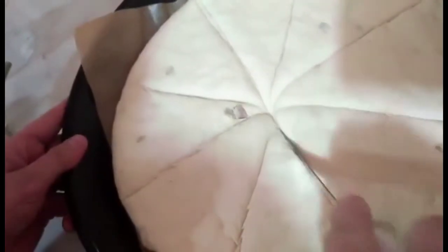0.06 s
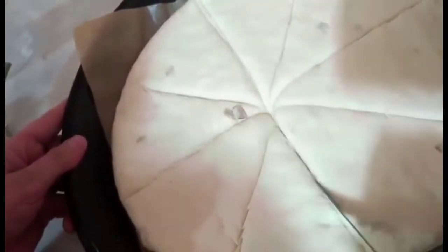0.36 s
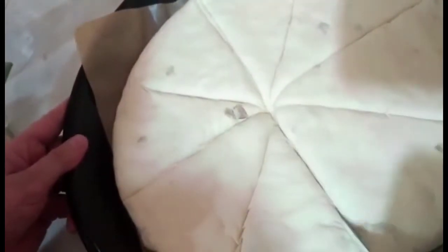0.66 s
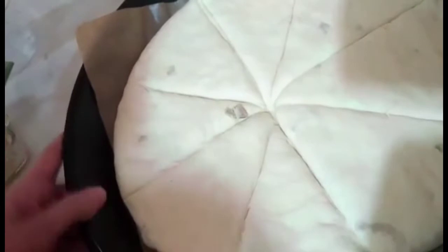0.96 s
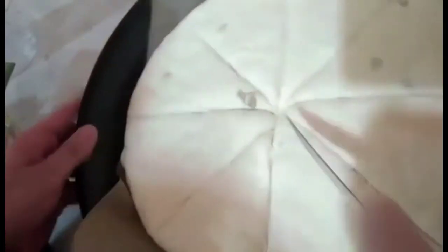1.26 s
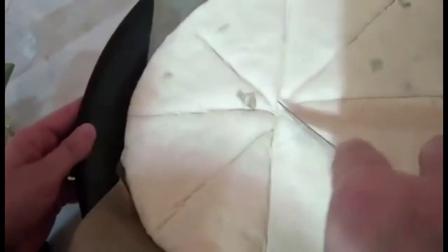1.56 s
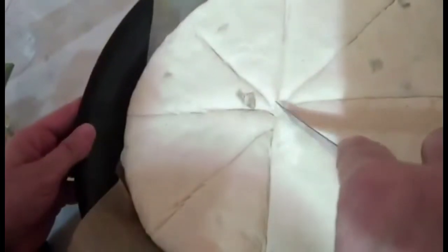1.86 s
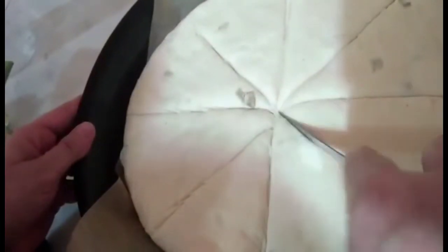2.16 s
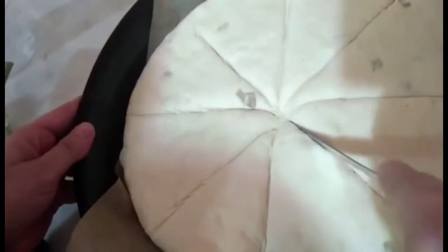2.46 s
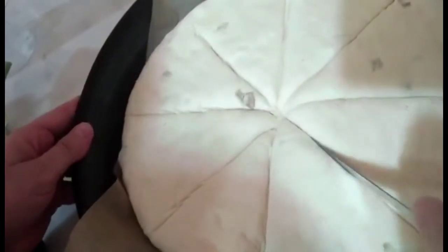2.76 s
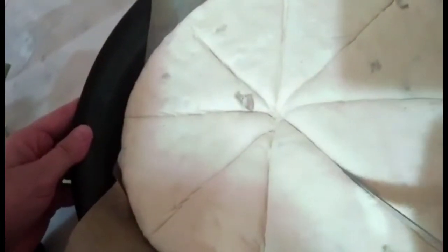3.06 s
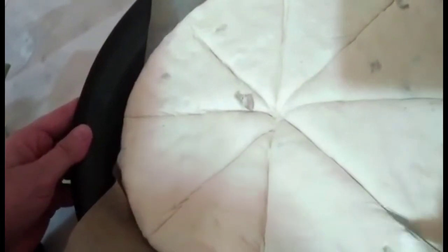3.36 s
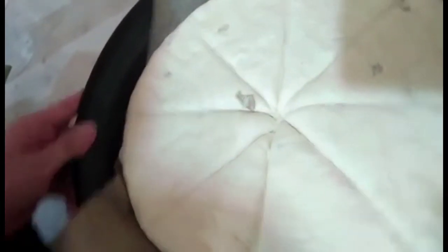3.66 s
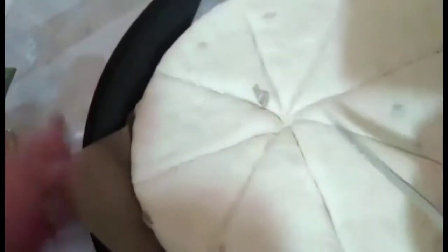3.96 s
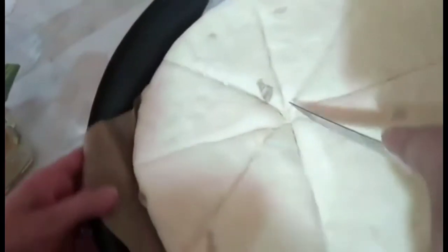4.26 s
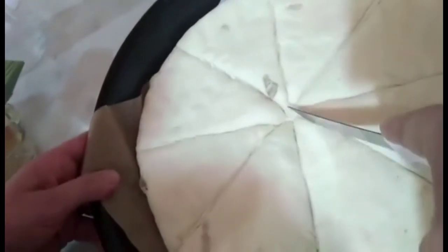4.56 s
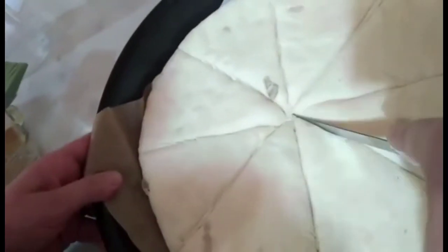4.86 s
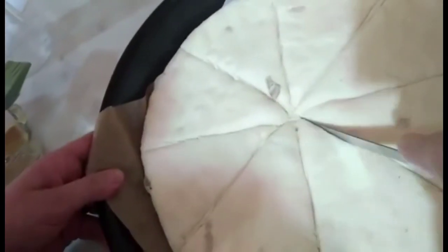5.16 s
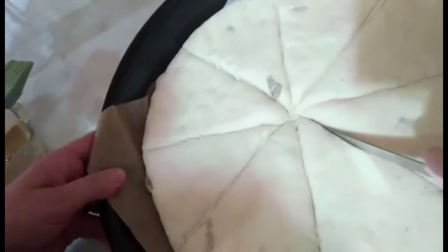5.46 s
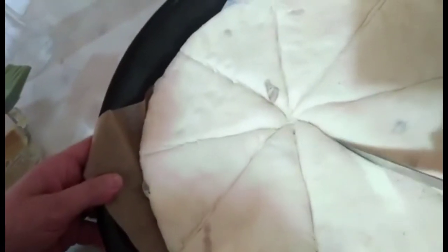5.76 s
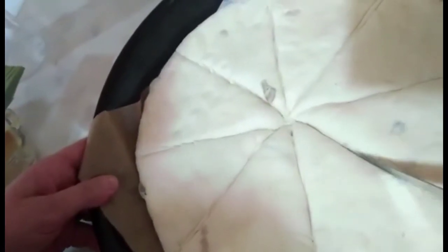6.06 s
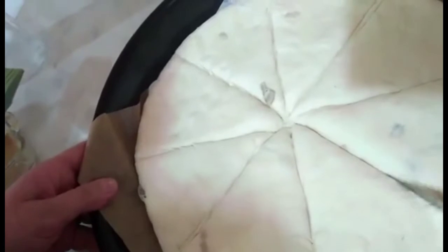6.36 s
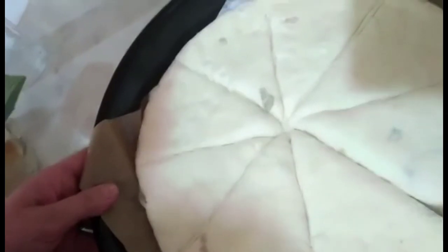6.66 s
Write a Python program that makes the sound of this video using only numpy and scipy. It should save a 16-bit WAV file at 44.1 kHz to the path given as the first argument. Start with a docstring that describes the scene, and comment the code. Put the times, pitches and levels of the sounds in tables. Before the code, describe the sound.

Close, fairly quiet handling sounds come in three short bursts as dough is cut in a paper-lined metal pan. First come a knife clink and the pan bumping and sliding on the table. Next are several short scrapes with crisp rustles and snaps of baking paper. Last, the blade clinks twice on the rim. Faint blade swishes, ticks and soft hand bumps sit between them over small-kitchen room air.

```python
"""Cutting dough in a metal pan.

Dough is cut into wedges in a paper-lined pan, in a small kitchen. The knife clinks and drags on the
rim, exciting the pan's modes. A hand turns the pan, which knocks and scrapes on the table by stick
and slip, then nudges it while pressing the baking paper, which rustles, buckles and snaps. Between
the bursts: faint swishes and ticks of the blade, low bumps of the hands, quiet room air."""
import sys
import numpy as np
from scipy import signal
from scipy.fft import rfft, irfft, next_fast_len
from scipy.io import wavfile

SR = 44100
rng = np.random.default_rng(int(sys.argv[2]) if len(sys.argv) > 2 else 0)


def generate_wav(signal):
    """Clip the signal to [-1, 1] and save it as 16-bit WAV at the path in sys.argv[1]."""
    frames = np.transpose(np.atleast_2d(signal))
    scaled = np.clip(frames, -1, 1) * 32767
    pcm = np.round(scaled).astype(np.int16)
    wavfile.write(sys.argv[1], SR, pcm)


N = 304731

# pan modes (frequency [Hz], level at rim spot a [dB], at b [dB], at c [dB], t60 [s])
PAN_MODES = [(662, -17.5, -18, -36, 0.38), (775, -21.5, -22, -14, 0.11), (983, -9, -5, -30, 0.22),
             (1019, -29.5, -18, -21, 0.24), (1193, -14.5, -12, -22, 0.19), (1314, -2, -15, -23.5, 0.17),
             (1514, 0.5, -13.5, -7, 0.28), (1630, -11, -5, -45, .2), (1698, -16, -9.5, -1, 0.089),
             (1971, -16, -12.5, -7, 0.22), (1932, -10, -8, -8, 0.36), (2135, -6.5, -3.5, -7, 0.13),
             (2228, -17, -13, -5, 0.3), (2425, -24, -16, -3, .2), (2505, -20, -7, -9, .28),
             (2562, -7.5, -9, -13, 0.15), (2610, -16, -5, -16, 0.14), (2858, 0, -3.5, -22, 0.28),
             (2900, -8.5, -6, -14.5, 0.15), (2980, -15.5, -16, -22, 0.37), (3260, -23, -18, -19, 0.12),
             (3388, -19.5, -13, -8, .12), (3890, -31, -25, -34, 0.14), (5010, -12, -10.5, -39, 0.065),
             (5450, -27, -12, -18, 0.057)]
# knife on rim (time [s], ring [dB], rim spot, clack [dB], clack tilt [dB/oct], extra contact ring [dB])
RIM_CLINKS = [(0.9626, -33.3, "a", -33, 0.5, -21), (1.1155, -45.5, "b", -47, 3, 7),
              (6.7486, -35.5, "c", -32, -.5, 2), (6.879, -35, "c", -23.5, 1, 5)]
# blade along rim (start [s], hold [s], level [dB], rim spot)
RIM_DRAGS = [(1.026, .04, -50, "b"), (1.09, .024, -44, "b"), (6.787, .042, -44.5, "c"),
             (6.86, .01, -45.5, "c")]
# light touches of the rim (time [s], level [dB], frequency [Hz], t60 [s])
RIM_GRAZES = [(1.372, -46, 2380, 0.2), (3.935, -52, 2445, .42)]
# pan on table (time [s], level [dB], decay [s], pitch factor)
PAN_KNOCKS = [(1.168, -44.5, 0.016, 1.01), (1.2912, -34, 0.012, 0.98), (3.665, -41, .016, 1.85),
              (3.904, -53, 0.011, 1.6), (4.23, -50, .01, 1.1)]
# hand turns the pan, then (last two rows) presses the rustling paper and nudges the pan
# (start [s], rise [s], slowing [s], scrape [dB], paper hiss [dB])
HAND_PUSHES = [(1.165, .012, .058, -43.5, -49), (1.238, .05, .125, -46.3, -51),
               (3.657, .022, .128, -47.5, -51), (3.885, .024, .085, -47.7, -50.5),
               (4.21, .018, .092, -49, -51), (4.325, .015, .115, -63.5, -61.5)]
# modes of the scraped pan (frequency [Hz], relative level [dB], t60 [s])
SCRAPE_MODES = [(603, -13, 0.35), (807, -1, .4), (998, -4, .3), (1098, -5, .4), (2358, -5, .25),
                (2420, -2, 0.27), (2510, -3, .2), (2850, -4.5, .2), (3470, -4, .12)]
# fingers or blade brush paper (start [s], hold [s], level [dB])
PAPER_BRUSHES = [(.966, .055, -60.5), (1.03, .04, -57), (1.086, .03, -54.5), (1.12, .04, -62.5),
                 (3.518, .04, -70.5), (3.595, .035, -69), (3.698, .055, -47.5), (3.8, .05, -61),
                 (3.86, .025, -51.5), (4.158, .018, -57), (4.19, .03, -51.5), (4.325, .12, -63),
                 (6.755, .11, -64)]
# paper buckles under fingers (start [s], hold [s], level [dB])
PAPER_CRUMPLES = [(3.752, .014, -48), (4.214, .042, -43.5), (4.276, .026, -43), (4.388, .012, -56)]
# creases snap (time [s], level [dB], decay [s], tilt [dB/oct])
CREASE_SNAPS = [(3.603, -59, .014, -10.5), (3.6349, -32.5, 0.00233, -4.5), (3.6545, -33.5, 0.0037, 2),
                (3.7548, -35, .003, -2.5), (3.987, -46, 0.004, -4), (4.182, -46, 0.0057, 5.5),
                (4.2234, -36, .002, -3.5), (4.2368, -18.5, 0.002, 0.5), (4.2566, -32, 0.0015, -2),
                (4.3015, -35, .0025, -2), (4.3895, -35.5, 0.0023, 0)]
# damped ticks of blade and pan (time [s], level [dB], pitch [Hz], decay [s])
SOFT_TICKS = [(1.581, -70, 2400, .006), (2.107, -53, 975, 0.0065), (2.431, -59, 1025, .007),
              (2.459, -70.5, 2000, 0.0098), (2.8055, -56, 1850, .004), (3.634, -40, 1700, .0045),
              (3.654, -46, 1900, .005), (4.483, -58.5, 900, 0.009), (5.205, -61, 1000, 0.0084)]
# low bumps of the hands (time [s], level [dB])
HAND_BUMPS = [(1.12, -53.5), (2.086, -61), (2.251, -53), (2.303, -59), (2.394, -58), (2.965, -56.5),
              (2.994, -57), (3.129, -55), (4.22, -57), (5.284, -56), (6.617, -54.5)]
# blade through dough (start [s], rise [s], hold [s], level [dB])
DOUGH_CUTS = [(.23, .04, .08, -77.5), (3.19, .05, .11, -75), (5.198, .025, .11, -72),
              (6.228, .022, .08, -72)]

# noise spectra (frequency [Hz], relative density [dB])
CLACK_SPECTRUM = [(120, -34.5), (250, -28), (500, -21.5), (770, -3.5), (950, -5), (1250, -3.5),
                  (1570, -3.5), (2360, 0), (2870, -5), (3420, -4.5), (4530, -19.5), (5130, -15),
                  (7420, -15), (12400, -43)]  # blade hits rim
KNOCK_SPECTRUM = [(120, -19), (200, -14), (280, -3), (400, -23), (560, -5.5), (760, 2), (900, -7.5),
                  (1330, 0.5), (1800, -10), (3000, -22), (8000, -51)]  # pan hits table
SCRAPE_SPECTRUM = [(120, -59.5), (200, -34.5), (382, -19), (681, -9), (759, 2), (868, -2), (993, 1),
                   (1510, 1), (1850, -4), (2060, -7.5), (2520, 1), (2730, -12), (5000, -18), (6500, -45),
                   (11000, -120)]  # base slides
GRATE_SPECTRUM = [(500, -30), (1100, -10.5), (1400, -4), (1650, -2), (1850, 1.5), (2150, -2.5),
                  (2700, -17.5), (5000, -32)]  # base sticks and slips
SLIDE_SPECTRUM = [(1760, -40.5), (3000, 1.5), (3320, -2), (4460, -8.5), (5090, -5), (8430, -7.5),
                  (10900, -12), (13000, -26), (13500, -42)]  # paper slides and rustles
PAPER_SPECTRUM = [(250, -30.5), (600, -20.5), (1250, -10), (2200, -3), (3330, 1), (4300, -7.5),
                  (5600, -6.5), (7200, -13.5), (8500, -7), (11500, -20.5), (13500, -31)]  # paper brushed or crumpled
SNAP_SPECTRUM = [(120, -41.5), (400, -20), (1000, -13), (2200, -15), (3400, 5), (4800, -1), (6500, -5),
                 (8500, -1), (12000, -9.5), (14000, -17.5)]  # crease snaps
CUT_SPECTRUM = [(400, -27), (800, -1), (1450, 6), (1800, -9), (2350, -1), (2800, -10), (3300, -8),
                (4500, -17), (12000, -24)]  # blade in dough
AIR_SPECTRUM = [(20, -16), (35, -7), (52, 3.5), (75, -4), (110, -7.5), (180, -9.5), (270, -11),
                (450, -13.5), (900, -13), (2000, -18), (3500, -24), (6000, -30.5), (9000, -31.5),
                (13000, -34)]  # room air

# room drone (centre [Hz], width [Hz], level [dB])
DRONE_BANDS = [(141, 5.8, -85), (272, 45, -85.5), (342, 14, -86.5), (427.3, 16, -93)]
# kitchen decay (frequency [Hz], t60 [s])
ROOM_T60 = [(150, .33), (800, 0.57), (2500, 0.43), (6000, 0.27), (13000, .16)]
# stereo width (frequency [Hz], side minus mid [dB])
SIDE_LEVELS = [(100, -57.5), (3000, -66), (4100, -24.5), (6000, -18), (8500, -12), (12500, -8.5)]


def rim_clinks():
    """The blade drives the pan's modes during contact, then they ring free. Returns rings, clacks."""
    rings, clacks = np.zeros((2, N))
    t = seconds(SR)
    contact_s, rise_s = .012, .0006
    contact = np.exp(-(t / contact_s) ** 4)
    rise = np.minimum(t / rise_s, 1)
    for s, ring_db, spot, clack_db, tilt_db, drive_db in RIM_CLINKS:
        add(rings, s, gain(ring_db) * ring(modes_at(spot)) * rise * (1 + gain(drive_db) * contact))
        clack = burst(CLACK_SPECTRUM, decay_s=.0085, squareness=2.5, tilt_db_oct=tilt_db)
        add(clacks, s, gain(clack_db) * clack)
        crush = burst(KNOCK_SPECTRUM, decay_s=.01)  # dough and paper give way first
        add(clacks, s - .006, gain(clack_db - 25) * crush)
    highpass = signal.butter(2, 700, "high", fs=SR, output="sos")  # thin metal radiates little bass
    return signal.sosfilt(highpass, rings), clacks


def pan_knocks():
    """Dull blows of the loaded pan on the table; grazes that ring the rim on one note."""
    out = np.zeros(N)
    for s, db, decay_s, pitch in PAN_KNOCKS:
        add(out, s, gain(db) * burst([(hz * pitch, level) for hz, level in KNOCK_SPECTRUM], decay_s))
    graze_rise = 1 - np.exp(-seconds(SR) / .008)
    for s, db, hz, t60_s in RIM_GRAZES:
        add(out, s, ring([(hz, db, t60_s)]) * graze_rise)
    return out


def hand_pushes():
    """Turned or nudged, the pan slips, scrapes and rings; the paper rustles. Both sag over each push."""
    scrape, slide = np.zeros((2, N))
    for s, rise_s, slowing_s, scrape_db, hiss_db in HAND_PUSHES:
        scrape += gain(scrape_db) * stroke(s, rise_s, slowing_s, sag_db=10, stop_s=.028)
        slide += gain(hiss_db) * stroke(s, rise_s, slowing_s, sag_db=9, stop_s=.019)
    slips = grains(per_s=1900, spread_db=2)
    body = ring(SCRAPE_MODES)
    ringing = convolved(unit_rms(slips) * scrape, body / np.linalg.norm(body))
    hiss = slide * coloured(grains(per_s=7000, spread_db=2.5), SLIDE_SPECTRUM)
    return scrape * coloured(slips, SCRAPE_SPECTRUM) + gain(-12) * ringing + hiss


def pan_grating():
    """Coarse stick and slip of the base on the table."""
    push = gain(-41.5) * stroke(start_s=3.659, rise_s=.016, hold_s=.125, sag_db=19, stop_s=.055)
    return push * coloured(grains(per_s=900, spread_db=.8), GRATE_SPECTRUM)


def rim_drags():
    """The pressed blade chatters along the rim, driving and damping the pan's modes."""
    out = np.zeros(N)
    damped_t60_s = .05
    for s, hold_s, db, spot in RIM_DRAGS:
        body = ring([(hz, level, damped_t60_s) for hz, level, _ in modes_at(spot)])
        chatter = unit_rms(convolved(grains(per_s=2000, spread_db=1.5), body))
        out += gain(db) * stroke(s, rise_s=.012, hold_s=hold_s, sag_db=2, stop_s=.014) * chatter
    return out


def baking_paper():
    """Light brushing, dense crackle of buckling fibres, single snapping creases."""
    touch = sum(gain(db) * stroke(s, rise_s=.012, hold_s=hold_s, sag_db=2, stop_s=.01)
                for s, hold_s, db in PAPER_BRUSHES)
    press = sum(gain(db) * stroke(s, rise_s=.01, hold_s=hold_s, sag_db=2, stop_s=.009)
                for s, hold_s, db in PAPER_CRUMPLES)
    buckles = sum(scattered(grains(per_s=110, spread_db=5), decay_s=.00079) for _ in range(12))
    friction = coloured(grains(per_s=3000, spread_db=2.5), PAPER_SPECTRUM, tilt_db_oct=2.2)
    out = touch * friction + press * coloured(buckles, PAPER_SPECTRUM)
    for s, db, decay_s, tilt_db in CREASE_SNAPS:
        add(out, s, gain(db) * burst(SNAP_SPECTRUM, decay_s, squareness=.77, tilt_db_oct=tilt_db))
    return out


def ticks_and_bumps():
    """Soft ticks of blade and pan; heavily damped low bumps of the hands."""
    out = np.zeros(N)
    for s, db, hz, decay_s in SOFT_TICKS:
        spectrum = [(hz / 2, -24), (hz * .85, -5), (hz * 1.08, -3), (hz * 1.35, -23), (hz * 4, -42)]
        add(out, s, gain(db) * burst(spectrum, decay_s, squareness=1.1))
    t = seconds(8192)
    bump_hz, rise_s = 66, .0035
    bump = t / rise_s * np.exp(1 - t / rise_s) * np.sin(2 * np.pi * bump_hz * t)
    for s, db in HAND_BUMPS:
        add(out, s, gain(db) * bump)
    return out


def dough_cuts():
    """Tiny slips of the blade through dough make a faint swish."""
    draw = sum(gain(db) * stroke(s, rise_s, hold_s, sag_db=5, stop_s=.06)
               for s, rise_s, hold_s, db in DOUGH_CUTS)
    return draw * coloured(grains(per_s=3000, spread_db=3.5), CUT_SPECTRUM)


def background():
    """Room air and drone, with a faint buzzy recorder hiss that follows the low rumble."""
    drone = sum(gain(db) * noise_band(hz, width_hz) for hz, width_hz, db in DRONE_BANDS)
    tremor_spectrum = [(25, -21.5), (50, 4.5), (90, -6.5), (180, -13), (400, -32.5), (2000, -81.5)]
    tremors = gain(-82.5) * coloured(grains(per_s=14, spread_db=2), tremor_spectrum)  # hand on microphone
    air = gain(-75) * coloured(rng.standard_normal(N), AIR_SPECTRUM)
    rumble = filtered(air, lambda hz: hz < 450)
    hiss = filtered(air, lambda hz: (hz >= 450) & (hz < 4000))
    recorder_buzz = unit_rms(1 - .64 * np.tanh(1.5 * unit_rms(rumble + drone)))
    return air + (recorder_buzz - 1) * hiss + drone + tremors


def kitchen_reverb(x, delay_s=.006, taps_per_s=3000):
    """Sparse reflections of random sign; each band decays at its own rate."""
    taps = rng.choice([-1., 1.], SR) * (rng.random(SR) < taps_per_s / SR) * (seconds(SR) > delay_s)
    hz, t, bands = signal.stft(taps, SR, nperseg=256)
    decay = gain(-60 * t / lookup(ROOM_T60, hz)[:, None])
    tail = signal.istft(bands * decay, SR, nperseg=256)[1]
    return convolved(x, tail / np.linalg.norm(tail))


def widened(mid):
    """Treble reaches the two ears with differing phases."""
    knots_hz = np.arange(0, SR, 60)
    phase_rad = np.cumsum(rng.normal(0, 1.5, len(knots_hz)))
    side = filtered(
        mid, lambda hz: gain(lookup(SIDE_LEVELS, hz)) * np.exp(1j * np.interp(hz, knots_hz, phase_rad)))
    return np.array([mid + side, mid - side])


def modes_at(spot):
    """Pan modes as excited at one rim spot."""
    return [(hz, levels_db["abc".index(spot)], t60_s) for hz, *levels_db, t60_s in PAN_MODES]


def ring(modes):
    """Decaying sines of random phase from (frequency [Hz], level [dB], t60 [s])."""
    t = seconds(SR)
    return sum(gain(db - 60 * t / t60_s) * np.sin(2 * np.pi * (hz * t + rng.random()))
               for hz, db, t60_s in modes)


def burst(spectrum, decay_s, squareness=1, tilt_db_oct=0):
    """Sudden, decaying puff of coloured noise."""
    t = seconds(8192)
    envelope = (1 - np.exp(-t / .0003)) * np.exp(-(t / decay_s) ** squareness)
    return envelope * coloured(rng.standard_normal(len(t)), spectrum, tilt_db_oct)


def stroke(start_s, rise_s, hold_s, sag_db, stop_s):
    """Envelope of one hand movement: rise, sagging hold, decay."""
    t = seconds(N) - start_s
    held_s = t - rise_s
    rise = np.clip(t / rise_s, 0, 1)
    sag = gain(-sag_db * np.clip(held_s / hold_s, 0, 1))
    return rise * sag * np.exp(-np.maximum(held_s - hold_s, 0) / stop_s)


def grains(per_s, spread_db):
    """Random impulses of uneven size."""
    size = gain(spread_db * np.minimum(rng.exponential(1, N), 4))
    return size * rng.choice([-1, 1], N) * (rng.random(N) < per_s / SR)


def scattered(x, decay_s):
    """Smears each grain over many short paths across sheet and pan."""
    t = seconds(1024)
    return unit_rms(convolved(x, rng.standard_normal(len(t)) * np.exp(-t / decay_s)))


def noise_band(centre_hz, width_hz):
    """Narrow noise at rms 1."""
    noise = rng.standard_normal(N)
    return unit_rms(filtered(noise, lambda hz: 1 / (1 + (2 * (hz - centre_hz) / width_hz) ** 2)))


def coloured(x, spectrum, tilt_db_oct=0):
    """Applies a spectrum, tilted above 1 kHz; rms 1."""
    def response(hz):
        return gain(lookup(spectrum, hz) + tilt_db_oct * np.log2(np.maximum(hz / 1000, 1)))
    return unit_rms(filtered(x, response))


def filtered(x, response):
    """Applies response(hz) by FFT."""
    size = next_fast_len(len(x), real=True)
    return irfft(rfft(x, size) * response(np.fft.rfftfreq(size, 1 / SR)), size)[:len(x)]


def lookup(table, hz):
    """Interpolates over log frequency."""
    knots_hz, values = np.transpose(table)
    return np.interp(np.log(hz + 1), np.log(knots_hz), values)


def add(mix, start_s, sound):
    part = mix[round(start_s * SR):][:len(sound)]
    part += sound[:len(part)]


def convolved(x, impulse_response):
    return signal.fftconvolve(x, impulse_response)[:N]


def unit_rms(x):
    return x / np.sqrt(np.mean(x ** 2) + 1e-20)


def gain(db):
    return 10 ** (np.asarray(db) / 20)


def seconds(samples):
    return np.arange(samples) / SR


def scene():
    """All sources close and centred, with a little kitchen reverb and widened treble."""
    rings, clacks = rim_clinks()
    handling = (pan_knocks() + hand_pushes() + pan_grating() + rim_drags()
                + baking_paper() + dough_cuts() + ticks_and_bumps())
    reverb = kitchen_reverb(gain(-15) * rings + gain(-5) * clacks + gain(-13.5) * handling)
    return widened(rings + clacks + handling + reverb + background())


def record(dry):
    """Low-pass and a small DC offset."""
    cutoff_hz, dc_offset = 13350, -.0003
    lowpass = signal.firwin(255, cutoff_hz, window=("kaiser", 8), fs=SR)
    return dc_offset + signal.oaconvolve(dry, lowpass[None], "same")


dry = scene()
out = record(dry)
generate_wav(out)
```